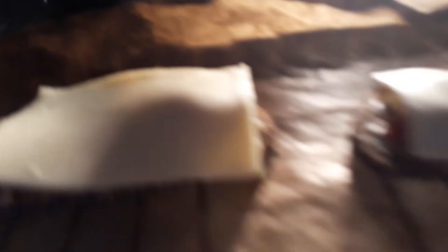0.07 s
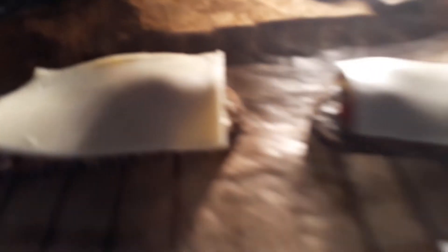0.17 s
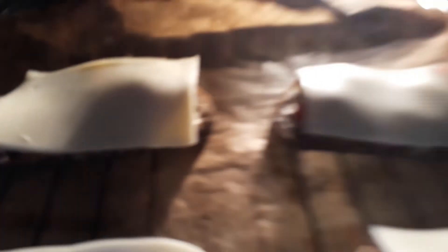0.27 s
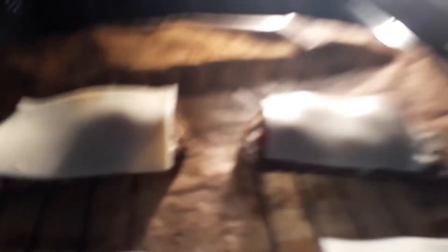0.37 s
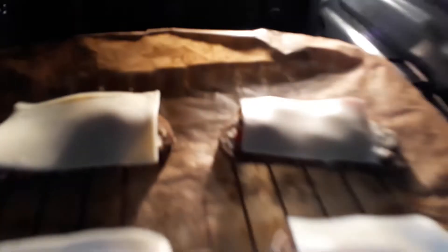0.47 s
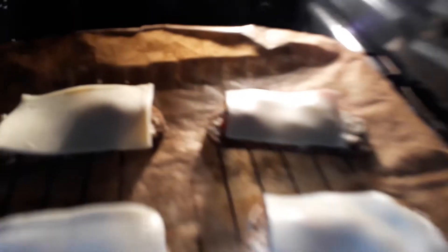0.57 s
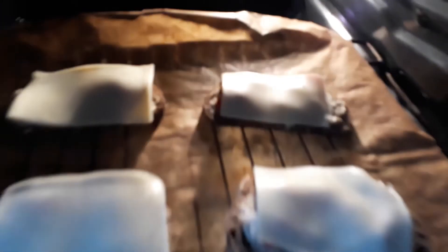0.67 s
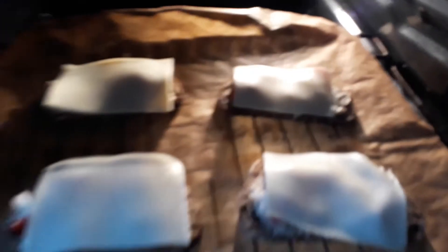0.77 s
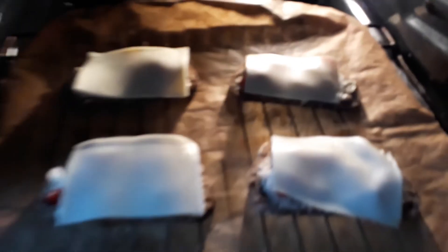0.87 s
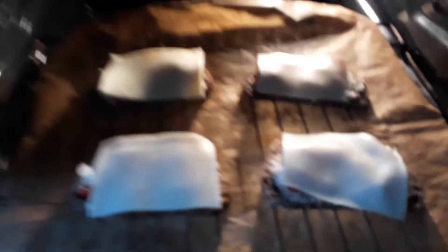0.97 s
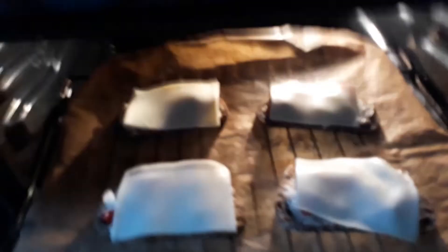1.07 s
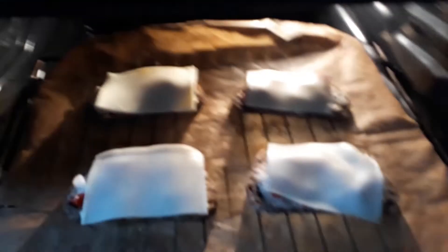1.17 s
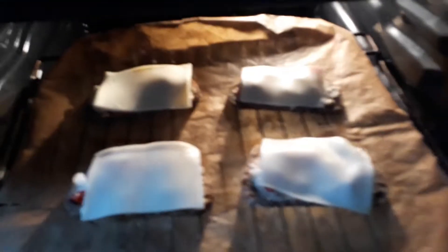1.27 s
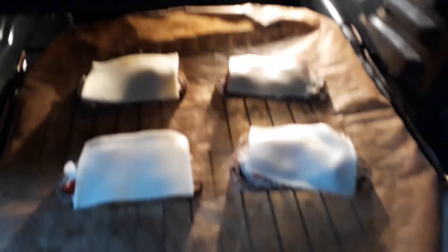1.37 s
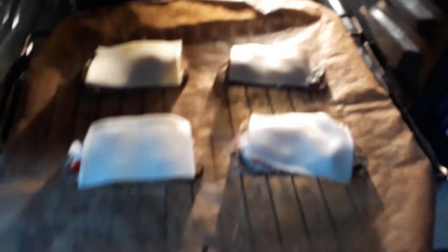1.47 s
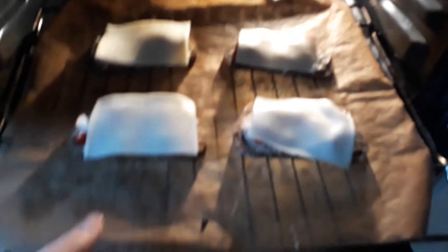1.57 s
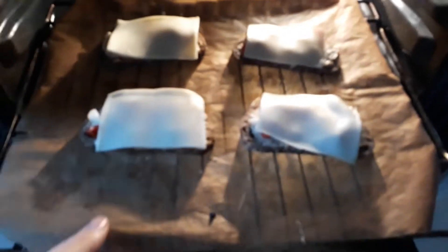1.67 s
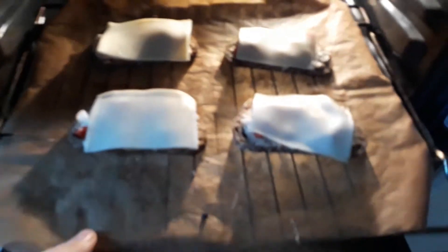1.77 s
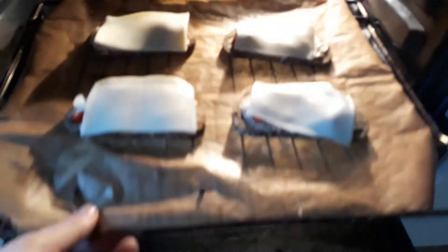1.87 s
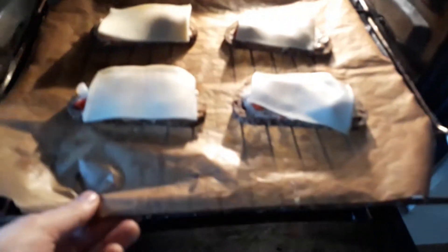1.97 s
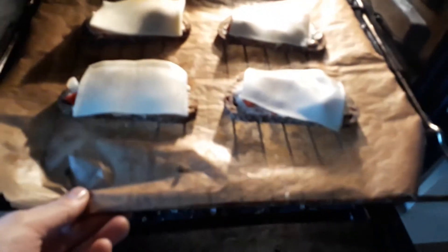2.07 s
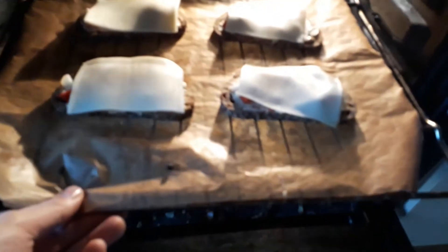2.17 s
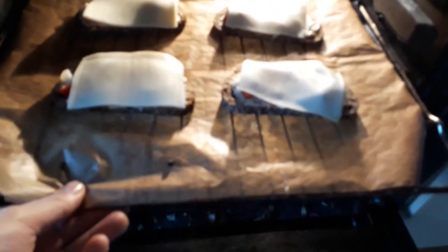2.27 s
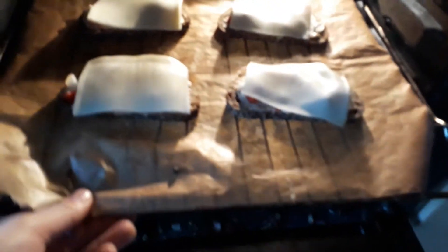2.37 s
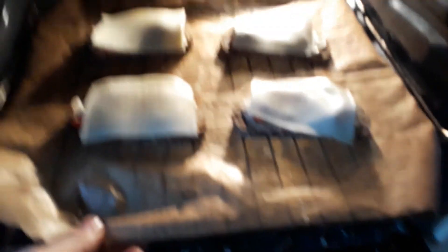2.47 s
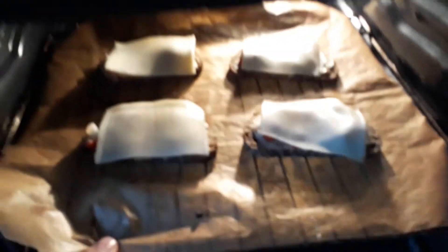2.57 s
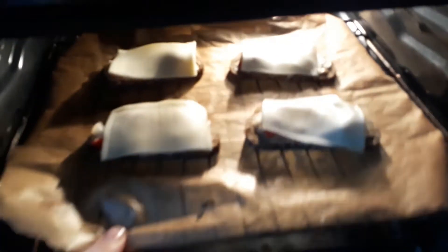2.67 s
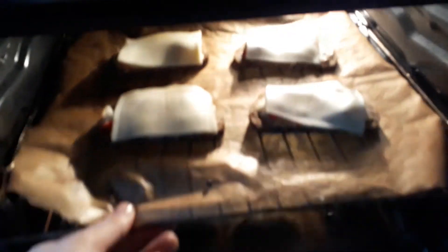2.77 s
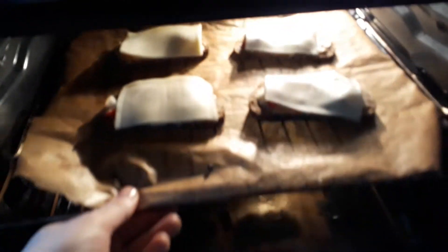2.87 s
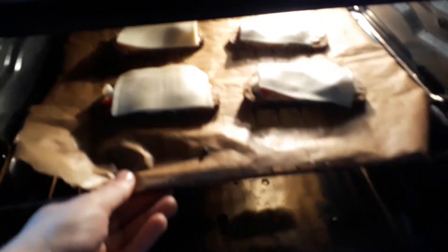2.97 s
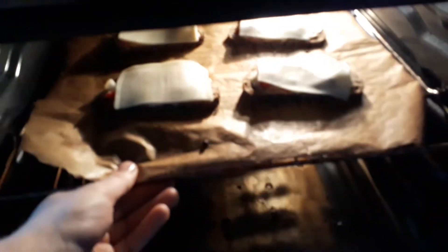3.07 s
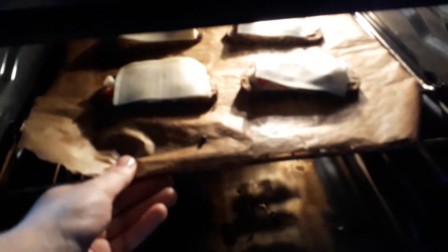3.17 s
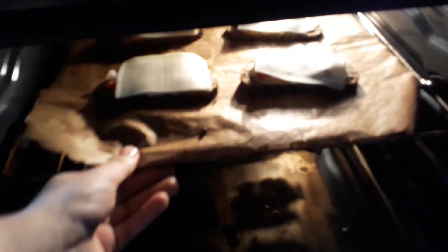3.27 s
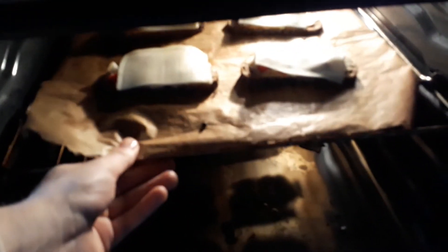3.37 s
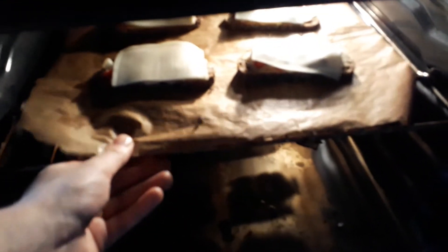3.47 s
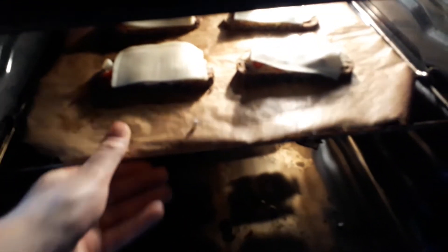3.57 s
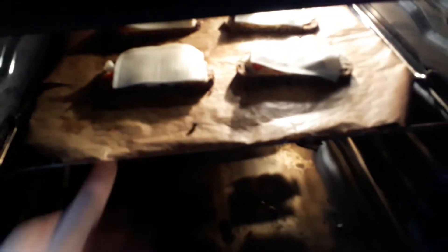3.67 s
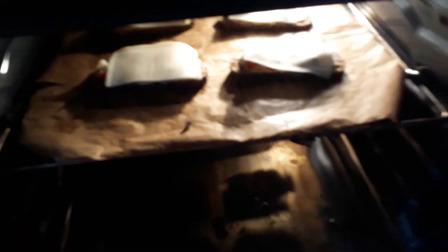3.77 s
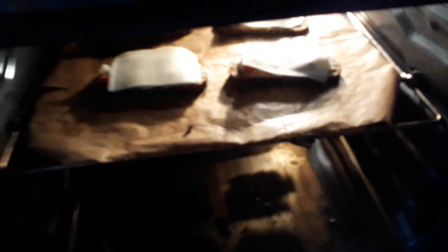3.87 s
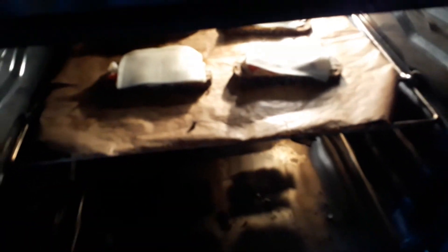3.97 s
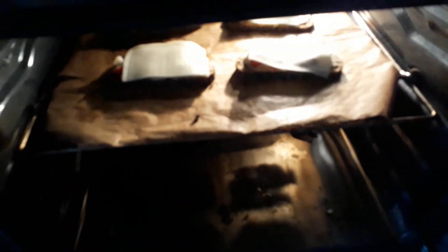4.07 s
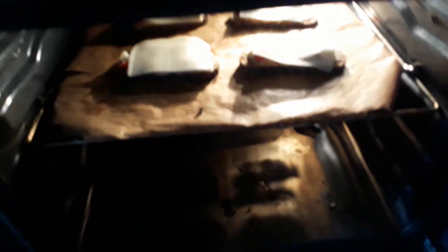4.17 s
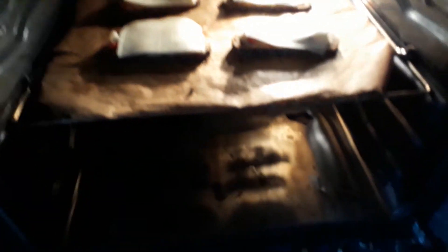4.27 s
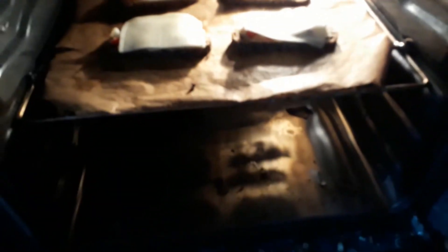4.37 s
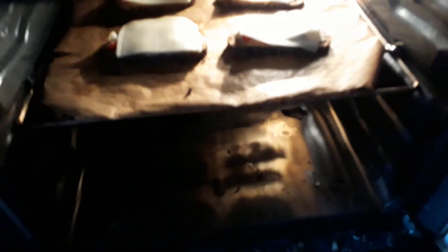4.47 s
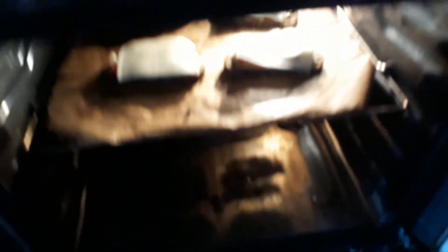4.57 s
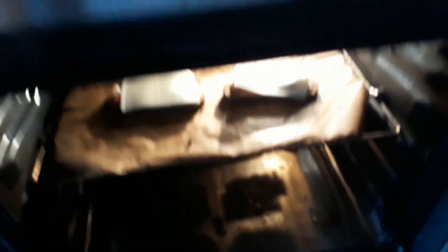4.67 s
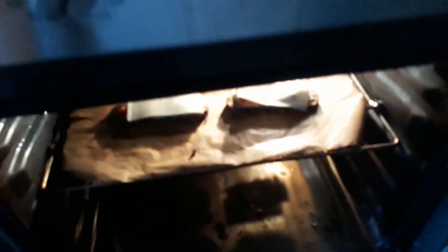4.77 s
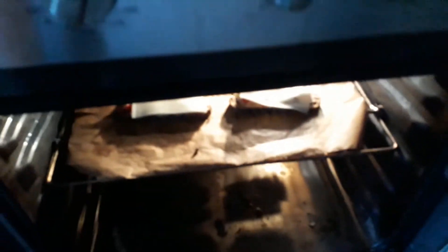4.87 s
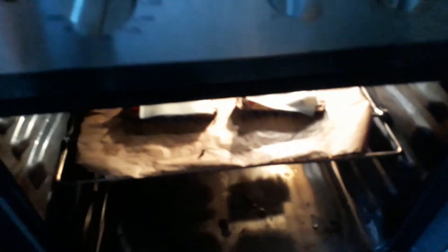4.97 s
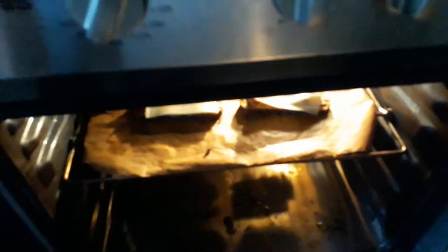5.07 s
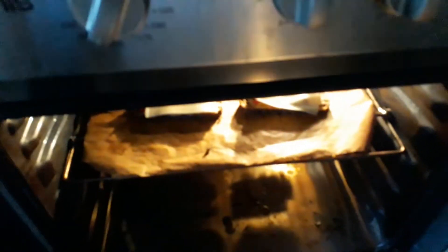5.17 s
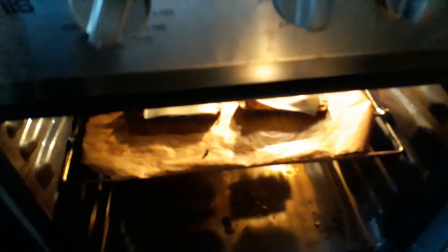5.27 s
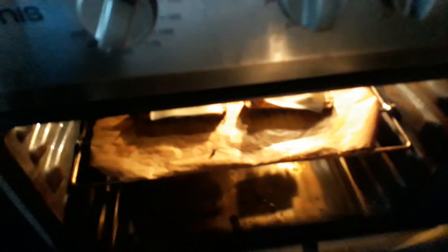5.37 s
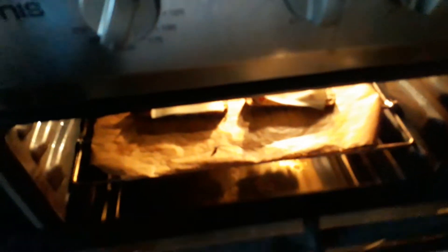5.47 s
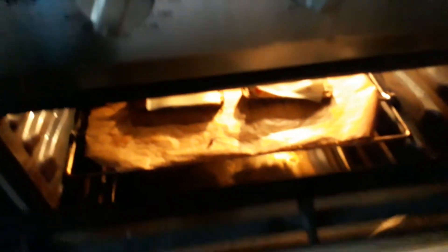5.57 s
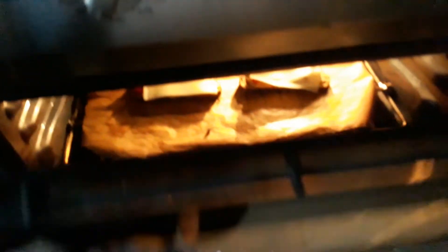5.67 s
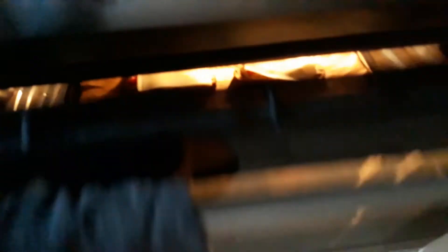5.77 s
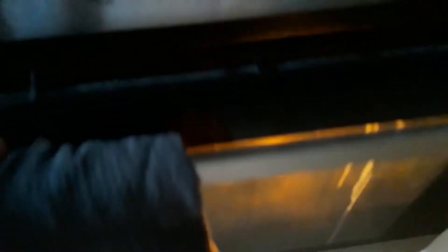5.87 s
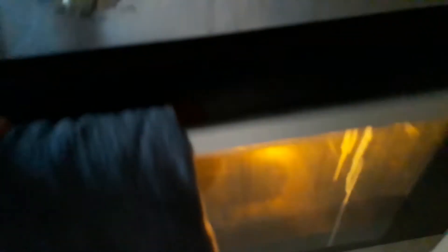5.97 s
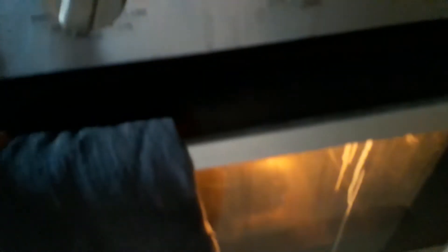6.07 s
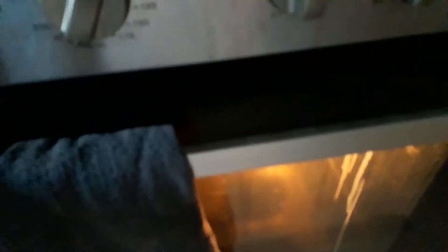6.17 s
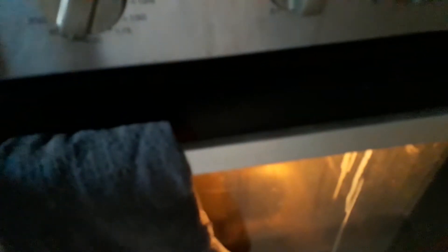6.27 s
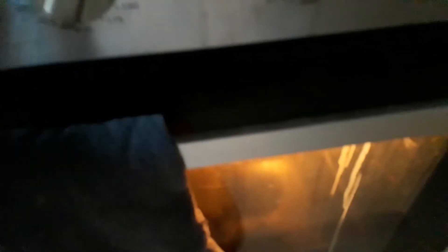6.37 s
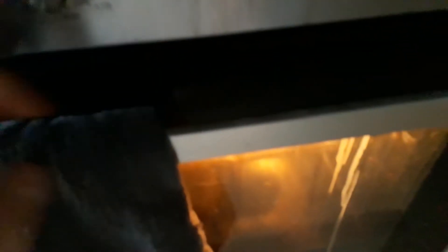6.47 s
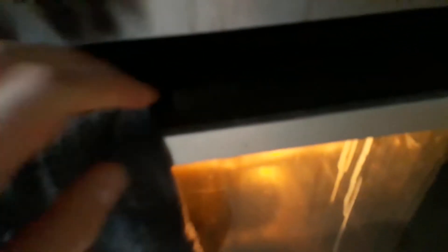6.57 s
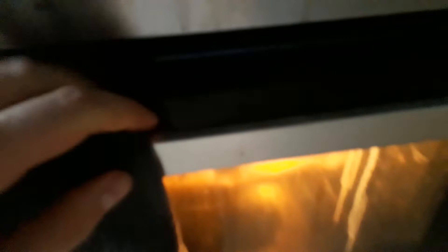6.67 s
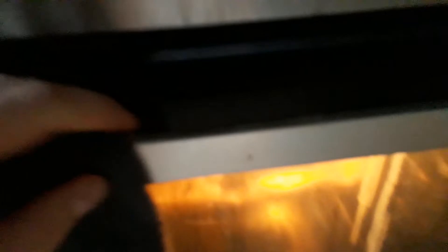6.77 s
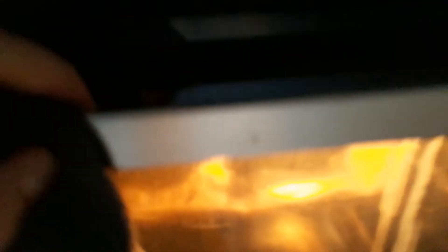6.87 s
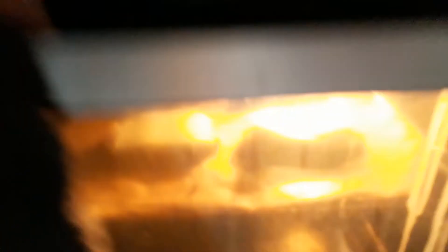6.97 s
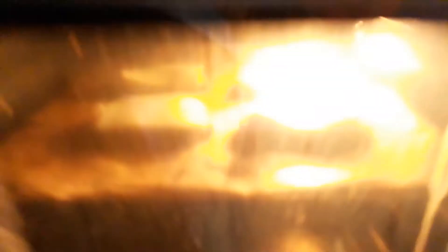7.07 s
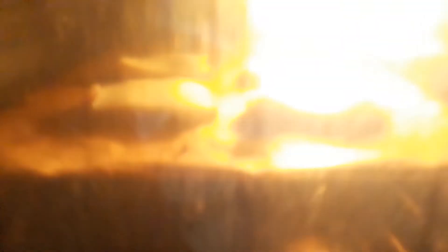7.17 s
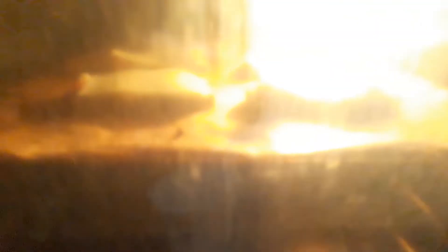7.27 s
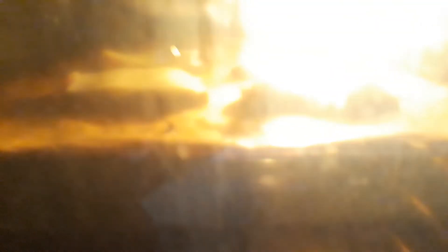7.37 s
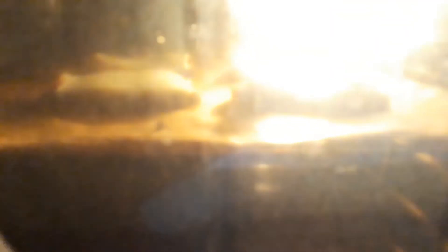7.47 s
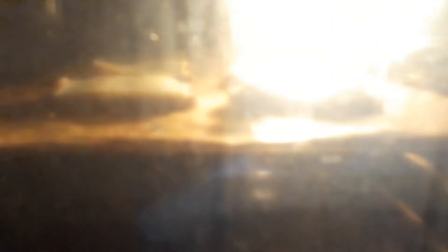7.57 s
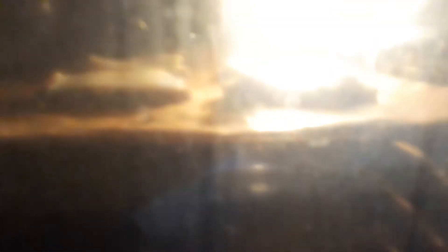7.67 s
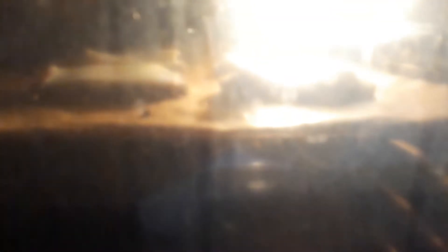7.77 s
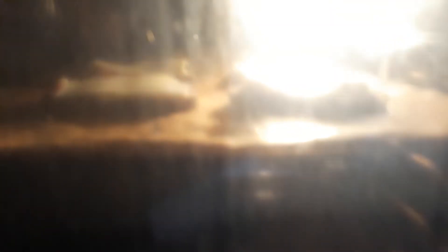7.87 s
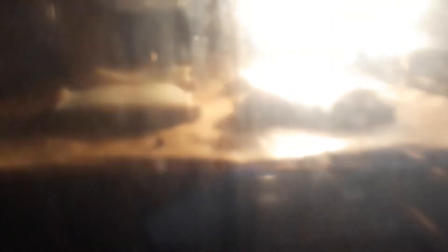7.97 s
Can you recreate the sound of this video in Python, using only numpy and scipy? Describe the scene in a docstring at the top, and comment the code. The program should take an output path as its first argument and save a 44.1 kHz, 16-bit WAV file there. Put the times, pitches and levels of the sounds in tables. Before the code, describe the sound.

A paper-lined tray scrapes and clanks into an oven in a quiet kitchen; after a pause the door slams, followed by soft cloth rubbing.

```python
"""Baking tray going into an oven

A tray lined with crackling paper grinds along a wire rack in a small kitchen and knocks home. The door is
lifted on clunking hinges and bangs shut; a towel slides off the handle; fingers brush the hand-held microphone.
Rubbing is filtered noise in strokes that swell, hold and die away. Impacts are a crack with a dying rattle,
and metal bodies ring at their own notes; the door's softest bumps are just a short hollow note."""
import sys
import numpy as np
from scipy import signal
from scipy.fft import rfft, irfft
from scipy.io import wavfile

SR = 44100
rng = np.random.default_rng(int(sys.argv[2]) if len(sys.argv) > 2 else 0)


def generate_wav(signal):
    """Clip the signal to [-1, 1] and save it as 16-bit WAV at the path in sys.argv[1]."""
    frames = np.transpose(np.atleast_2d(signal))
    scaled = np.clip(frames, -1, 1) * 32767
    pcm = np.round(scaled).astype(np.int16)
    wavfile.write(sys.argv[1], SR, pcm)


N = 353020
TIME = np.arange(N) / SR   # seconds


def from_db(db):
    """Turn decibels into a gain."""
    return 10 ** (np.asarray(db) / 20)


def at_hz(points, hz):
    """Read a table of (Hz, value) along a log-frequency axis."""
    table = np.array(points)
    return np.interp(np.log(hz + 1), np.log(table[:, 0]), table[:, 1])


def decay(t, t60):
    """Height of a dying vibration after t seconds; it falls 60 dB in t60 seconds."""
    return np.exp(-np.log(1000) * t / np.maximum(t60, 1e-3))


def convolve(x, response):
    """Filter a sound, keeping its length."""
    return signal.fftconvolve(x, np.atleast_2d(response), axes=1)[:, :x.shape[1]]


def tilt_at(hz, tilt_db, pivot_hz):
    """A slope in dB: flat well below the pivot, tilt_db per octave well above it."""
    return tilt_db * np.log2(1 + hz / pivot_hz)


def colour(x, spectrum, tilt_db=0, pivot_hz=200, size=4096):
    """Filter with this spectrum, scaled to unit power and then tilted; nothing sounds early."""
    hz = np.fft.rfftfreq(size, 1 / SR)
    gain = from_db(at_hz(spectrum, hz))
    gain = gain / np.sqrt(np.mean(gain ** 2))
    gain = gain * from_db(tilt_at(hz, tilt_db, pivot_hz))
    # fold the cepstrum to one side, which makes the filter minimum phase
    cepstrum = irfft(np.log(gain))[:size // 2]
    cepstrum[1:] *= 2
    return convolve(x, irfft(np.exp(rfft(cepstrum, size))))


def noise(size, grain_db=0, apart_hz=620):
    """Stereo noise made of grains of uneven size; long waves reach both microphones alike."""
    mid, side = rng.standard_normal((2, size))
    side = signal.sosfilt(signal.butter(2, apart_hz, "high", fs=SR, output="sos"), side)
    # each grain lasts 24 samples
    grain_sizes = np.minimum(rng.exponential(1, size // 24 + 1), 4.5)
    grains = np.repeat(from_db(grain_db * grain_sizes), 24)[:size]
    return np.array([mid + side, mid - side]) * grains / np.sqrt(np.mean(grains ** 2))


def ring(force, hz, t60):
    """A resonator: a unit click sets a dying sine of height 1 ringing."""
    r, w = decay(1 / SR, t60), 2 * np.pi * hz / SR
    return signal.lfilter([0, np.sin(w)], [1, -2 * r * np.cos(w), r * r], force + 1e-18)


def panned(x, pan_db):
    """Lean a sound to the left (right if negative) at constant power."""
    gains = from_db([[pan_db / 2], [-pan_db / 2]])
    return x * gains / np.sqrt(np.mean(gains ** 2))


def shaded(x, pan_db, bass_hz=600):
    """A source to one side: the bass bends round to both microphones, the treble does not."""
    bass = signal.lfilter(*signal.butter(1, bass_hz, fs=SR), x)
    return bass + panned(x - bass, pan_db)


def add(out, s, sound):
    """Mix a sound in at its time in seconds."""
    start = round(s * SR)
    out[:, start:start + sound.shape[1]] += sound[:, :N - start]


def strokes(rows, rise_s, fall_s):
    """Gain of rubbing: each stroke swells, holds from start to end and dies; rise and fall span 60 dB."""
    gain = 1e-8
    for start, end, db, *_ in rows:
        swell = decay(np.maximum(start - TIME, 0), rise_s)
        fade = decay(np.maximum(TIME - end, 0), fall_s)
        gain = np.maximum(gain, from_db(db) * swell * fade)
    return gain


def blow(spectrum, tilt_db, rattle_t60, crack_db, grain_db, pivot_hz,
         modes=(), chatter=.5, detune=0, size=28000):
    """A crack and a dying rattle of small contacts, which also set the body's modes ringing."""
    click = signal.unit_impulse(size)
    rattle = noise(size, grain_db) * decay(np.arange(size) / SR, rattle_t60)
    out = colour(rattle + from_db(crack_db) * click, spectrum, tilt_db, pivot_hz)
    force = click + chatter * rattle / np.sqrt(np.sum(rattle[0] ** 2))
    # detune shifts the modes a little with the point of support
    shifts = rng.uniform(-1.1, 1, len(modes))
    for k, ((hz, db, t60), shift) in enumerate(zip(modes, shifts)):
        height = (-1) ** k * from_db(db + tilt_at(hz, tilt_db, pivot_hz))
        out += height * ring(force, hz * (1 + detune * shift), t60)
    return out


# How long the kitchen echoes at each pitch. Each row: frequency in Hz, time to fall 60 dB in seconds.
KITCHEN_DECAY = [(60, 0.62), (300, 0.47), (700, 0.33), (4000, 0.37), (8000, 0.28), (16000, 0.19)]


def kitchen(x, wet_db, bass_hz=60, build_s=0.0023, size=36000):
    """Direct sound plus wall reflections that build up quickly and die soonest in the high treble."""
    t, hz = np.arange(size) / SR, np.fft.rfftfreq(size, 1 / SR)
    white, centres = rfft(noise(size)), [f for f, t60 in KITCHEN_DECAY]
    tail = 0
    for share, (f, t60) in zip(np.eye(len(centres)), KITCHEN_DECAY):
        band = irfft(white * at_hz(list(zip(centres, share)), hz), size)
        tail = tail + band * decay(t, t60)
    tail = tail * (1 - np.exp(-(t / build_s) ** 2))
    # a small source radiates little bass into the room
    tail = signal.lfilter(*signal.butter(1, bass_hz, "high", fs=SR), tail)
    return x + from_db(wet_db) * convolve(x, tail / np.sqrt(np.sum(tail ** 2) / 2))


# Spectrum of the kitchen's faint hiss. Each row: frequency in Hz, relative dB per Hz.
QUIET_SPECTRUM = [(25, -27.5), (64, -4.5), (220, -17), (700, -23), (3000, -24), (4000, -19), (6500, -24),
                  (8500, -31), (16000, -30)]


def quiet():
    """The faint steady hiss of the kitchen is filtered noise."""
    return from_db(-71) * shaded(colour(noise(N), QUIET_SPECTRUM), pan_db=-4.5)


# The palm shifts its grip. Each row: start in seconds, end in seconds, relative level in dB.
GRIP_STROKES = [(.25, 0.715, -68), (.425, 0.53, -46.5), (.52, 0.622, -48)]
# Fingers scuff the casing. Each row: start in seconds, end in seconds, relative level in dB.
SCUFF_STROKES = [(.257, .27, -52), (.354, .366, -46), (.39, .69, -61.5)]
# A finger wipes past the left microphone, swelling and then breaking off.
# Each row: start in seconds, end in seconds, relative level in dB.
WIPE_STROKES = [(.947, .959, -40.5), (.98, .992, -58.5)]
# Fingers tap beside the microphones. Each row: time in seconds, relative level in dB,
# tilt in dB per octave, time for the rattle to fall 60 dB in seconds, lean to the left in dB.
FINGER_TAPS = [(.957, -36, -21, .14, 19), (6.892, -41.5, -6.5, 0.061, 2), (6.903, -43, -2.5, 0.28, -2.5),
               (7.943, -43, 0, 0.18, 33), (7.986, -49.5, 2, 0.63, 29)]
# Spectrum of the rubbing palm. Each row: frequency in Hz, relative dB per Hz.
SKIN_SPECTRUM = [(50, -19), (110, 1.5), (220, 0.5), (420, -1.5), (1600, -5), (2700, -14), (6500, -10),
                 (9200, -16.5), (14000, -8.5), (16000, -11)]
# Spectrum of a wiping or tapping finger, before any tilt. Each row: frequency in Hz, relative dB per Hz.
FINGER_SPECTRUM = [(60, -14), (130, 1.5), (260, -14.5), (450, -1), (900, -0.5), (1600, 0), (5000, 0.5),
                   (7000, -0.5), (9000, -6.5), (11000, -4.5), (16000, -20)]


def fingers():
    """Skin rubs and taps right at the microphones, too close for the room to matter."""
    palm_rub = noise(N, grain_db=2.0) * strokes(GRIP_STROKES, rise_s=0.27, fall_s=0.11)
    palm = colour(palm_rub, SKIN_SPECTRUM)
    scuff_rub = noise(N, grain_db=2) * strokes(SCUFF_STROKES, rise_s=0.054, fall_s=0.21)
    scuff = colour(scuff_rub, [(200, -31), (900, -6.5), (2300, 1.5), (3500, -6.0),
                               (6000, -7.0), (9000, -21.0), (16000, -6)])   # Hz, relative dB per Hz
    out = shaded(palm + scuff, pan_db=-15, bass_hz=1510)
    wipe_rub = noise(N, grain_db=2.5) * strokes(WIPE_STROKES, rise_s=0.2, fall_s=0.02)
    out += from_db(-2.5) * panned(colour(wipe_rub, FINGER_SPECTRUM), pan_db=30)
    for s, db, tilt, rattle, pan in FINGER_TAPS:
        tap = blow(FINGER_SPECTRUM, tilt, rattle, crack_db=11.0, grain_db=0.0, pivot_hz=2016)
        add(out, s, from_db(db + 4.0) * panned(tap, pan))
    return out


# Light clicks of the oven's fittings. Each row: time in seconds, relative level in dB,
# time for the rattle to fall 60 dB in seconds, lean to the left in dB.
FITTING_CLICKS = [(.727, -43.5, 0.33, -0.5), (5.543, -42.5, 0.34, -4), (6.339, -57, 0.12, -2.5)]
# Spectrum of a click. Each row: frequency in Hz, relative dB per Hz.
CLICK_SPECTRUM = [(100, -11.5), (300, -16.5), (1000, -14.5), (2000, -4), (3500, 0), (6500, -4.5),
                  (8500, -13), (16000, -12)]


def clicks():
    """Small metal parts tick and rattle."""
    out = np.zeros((2, N))
    for s, db, rattle, pan in FITTING_CLICKS:
        click = blow(CLICK_SPECTRUM, 0, rattle, crack_db=3, grain_db=1.5, pivot_hz=1500)
        add(out, s, from_db(db - 3) * panned(click, pan))
    return kitchen(out, wet_db=-5.5)


# The tray slides in shoves. Each row: start in seconds, end in seconds, relative grinding level in dB.
TRAY_SHOVES = [(1.52, 1.58, -60.5), (1.69, 2.52, -50), (2.56, 2.563, -42.5), (2.6, 2.793, -42.5),
               (2.84, 2.88, -42), (2.9, 3.24, -45), (3.47, 3.54, -51.5)]


def shoving():
    """Effort of the shoves, which drives both the grinding tray and the rustling paper."""
    return strokes(TRAY_SHOVES, rise_s=0.22, fall_s=0.61)


# The paper crumples in runs of snaps. Each row: start in seconds, end in seconds,
# relative snap level in dB, tilt in dB per octave.
PAPER_CRUMPLES = [(1.654, 1.697, -13, -7), (1.715, 1.77, -10.5, -0.5), (3.454, 3.5, -15, -7.5)]
SNAP_GAP_S, SNAP_SPREAD_DB = .014, 0.5   # average gap and largest change of level within a run


def crumple_snaps():
    """Each crumple is a run of unevenly spaced snaps of uneven size, in the columns of the loud snaps."""
    snaps = []
    for start, end, db, tilt in PAPER_CRUMPLES:
        for k, (shift, size) in enumerate(rng.uniform(-1, 1, (10, 2))):
            if k * SNAP_GAP_S < end - start:
                snaps.append((start + SNAP_GAP_S * (k + .3 * shift), db + SNAP_SPREAD_DB * size, tilt))
    return snaps


# Single loud paper snaps. Each row: time in seconds, relative level in dB, tilt in dB per octave.
PAPER_SNAPS = [(1.497, -31.5, 0.5), (1.549, -38.5, 3.5), (1.603, -37, 1), (1.632, -24, 0),
               (1.702, -13, 5.5), (1.761, -12.5, 2.5), (1.867, -6.5, -2), (1.917, -35, 3),
               (2.038, -25.5, -2), (2.099, -17, -0.5), (2.213, -13.5, 1), (2.249, -14, -3), (2.276, -15, 1),
               (2.333, -11, -15), (3.088, -18.5, 3), (3.397, -23, 1.5), (3.405, -12, 0),
               (3.44, -13.5, -1.5)]
# Spectrum of the paper, before any tilt. Each row: frequency in Hz, relative dB per Hz.
PAPER_SPECTRUM = [(100, -19.5), (500, 0), (1000, -7.5), (1500, -1), (4500, -2), (6500, -3.5), (8500, -9),
                  (10500, -5), (16000, -11.5)]


def paper():
    """Baking paper buckles in snaps over a bed of fine crackle, and rustles as the tray slides."""
    rustle = from_db(-17) * shoving()   # relative to the grinding
    crackle = from_db(-32) * strokes(PAPER_CRUMPLES, rise_s=0.14, fall_s=.15)   # relative to the snaps
    out = colour(noise(N, grain_db=1.5) * np.hypot(rustle, crackle), PAPER_SPECTRUM)
    for s, db, tilt in PAPER_SNAPS + crumple_snaps():
        snap = blow(PAPER_SPECTRUM, tilt, rattle_t60=0.036, crack_db=4.0, grain_db=1.5,
                    pivot_hz=3000, size=9000)
        add(out, s, from_db(db - 14.5) * snap)
    return kitchen(out, wet_db=-1.5)


# Notes of the free tray, before each contact shifts them.
# Each row: frequency in Hz, relative level in dB, time to fall 60 dB in seconds.
TRAY_NOTES = [(114, -11.5, 0.15), (135, -0.5, 0.19), (163.4, 1, 0.18), (209, -16, 0.41), (326, -12, 0.14),
              (383, -10.5, 0.13), (451, -11, 0.27), (552, -14, .22), (613, -12.5, 0.3), (735, -7.5, 0.26),
              (850, -16.5, 0.35), (1245, -16.5, 0.22), (1405, -17.5, 0.3), (2040, -17.5, 0.3),
              (2890, -25, .25), (3470, -22.5, .22)]
SLIP_DB, SLIP_SPREAD_DB = -7.5, 3   # slip level relative to the effort; scale of the spread among partials
# the point of contact shifts the tray's notes by up to this share, and scales their ring
SLIP_DETUNE, SLIP_DAMPING = 0.038, .55
# pings of the rack wires: lowest and highest pitch, level, slope in dB per octave, time to fall 60 dB
WIRE_LOW_HZ, WIRE_HIGH_HZ, WIRE_DB, WIRE_TILT_DB, WIRE_RING_S = 693, 4820, 5, -3, 0.025


def slips(effort, count=220, size=4400, order=7):
    """The rim catches and slips unevenly; each slip rings the tray anew and pings some rack partials."""
    out, t = np.zeros((2, N)), np.arange(size) / SR
    mode_hz, mode_db, mode_t60 = np.transpose(TRAY_NOTES)
    for s in rng.uniform(TRAY_SHOVES[0][0], TRAY_SHOVES[-1][1], count):
        octaves = rng.random(order) * np.log2(WIRE_HIGH_HZ / WIRE_LOW_HZ)
        tray_hz = mode_hz * (1 + SLIP_DETUNE * rng.uniform(-1, 1, len(mode_hz)))
        hz = np.r_[tray_hz, WIRE_LOW_HZ * 2 ** octaves]
        db = np.r_[mode_db, WIRE_DB + WIRE_TILT_DB * octaves]
        db = db + SLIP_SPREAD_DB * rng.uniform(-1.8, 2.6, len(hz))
        t60 = np.r_[mode_t60 * SLIP_DAMPING, np.full(order, WIRE_RING_S)]
        partials = np.sin(2 * np.pi * hz[:, None] * t) * decay(t, t60[:, None])
        # high partials reach the two microphones with unequal strength
        lean = rng.uniform(-1, 1, len(hz)) * np.minimum(hz / 1000, 1)
        signs = rng.choice([-1, 1], len(hz))
        gains = from_db(db + SLIP_DB) * signs * np.array([1 + lean, 1 - lean])
        add(out, s, effort[round(s * SR)] * gains @ partials)
    return out


# The tray knocks on the rack. Each row: time in seconds, relative level in dB, hardness in dB per octave.
TRAY_KNOCKS = [(1.511, -55, 3), (1.814, -23, -2), (1.979, -33, 2.5), (2.18, -25, -6), (2.387, -30, -7.5),
               (2.591, -26.5, 1), (2.612, -27.5, -4.5), (2.638, -19.5, -0.5), (2.811, -28.5, -5.5),
               (2.986, -20, -4.5), (3.094, -21, -6), (3.212, -32, -0.5), (3.224, -22.5, 0)]
# Spectrum of a knock, before its hardness tilts it. Each row: frequency in Hz, relative dB per Hz.
KNOCK_SPECTRUM = [(40, -27.5), (100, -3), (160, 15), (270, 3), (450, 4), (1000, 0), (1400, -3),
                  (3800, -4.5), (5500, -11.5), (8500, -24), (11000, -26), (16000, -30.5)]
# Spectrum of the steady grinding. Each row: frequency in Hz, relative dB per Hz.
GRIND_SPECTRUM = [(50, -30.5), (145, 0), (250, -3.5), (500, -11.5), (730, -8), (900, -15.5), (1900, -15),
                  (3000, -25), (3800, -20), (8700, -36), (16000, -35.5)]
# Spectrum of the tray's crash against the back wall. Each row: frequency in Hz, relative dB per Hz.
CRASH_SPECTRUM = [(170, 0), (300, -3.5), (450, 1), (950, -6), (1300, 0), (2000, -9), (3600, -6.5),
                  (4600, -13.5), (9000, -28.5)]
# Notes of the oven's back wall, which clanks when the tray reaches it.
# Each row: frequency in Hz, relative level in dB, time to fall 60 dB in seconds.
BACK_WALL_NOTES = [(373, -0.5, 0.15), (459, 4, .2), (860, -11, .26), (1206, 0.5, .17), (1445, -14, 0.3),
                   (1900, -13, 0.17), (2418, -9.5, 0.22), (2520, -7.5, .17), (3350, -8.5, .2),
                   (3570, -8, .16), (4130, -6.5, 0.092), (4533, -9.5, .2)]
HOME_S, HOME_DB, HOME_RING_S = 3.224, -22.5, 0.17   # the crash: when, how loud, 60 dB fall of its rattle


def tray():
    """Sheet metal bumps over the rack wires, grinds and rattles between bumps, and strikes the back wall."""
    out = np.zeros((2, N))
    for s, db, hardness in TRAY_KNOCKS:
        knock = blow(KNOCK_SPECTRUM, hardness, rattle_t60=0.18, crack_db=8.0, grain_db=1.0,
                     pivot_hz=260, modes=TRAY_NOTES, chatter=0.78, detune=0.031)
        add(out, s, from_db(db - 0.5) * knock)
    crash = blow(CRASH_SPECTRUM, 0, HOME_RING_S, crack_db=4, grain_db=2.5,
                 pivot_hz=260, modes=BACK_WALL_NOTES, chatter=.25)
    add(out, HOME_S, from_db(HOME_DB) * crash)
    effort = shoving()
    grinding = colour(noise(N, grain_db=1.5) * effort, GRIND_SPECTRUM)
    out += slips(effort) + from_db(-0.43) * grinding
    # a thin sheet radiates no deep bass
    radiated = signal.sosfilt(signal.butter(2, 62, "high", fs=SR, output="sos"), out)
    return shaded(kitchen(radiated, wet_db=-5.5, bass_hz=324), pan_db=-1.5)


# The door is swung. Each row: start in seconds, end in seconds, relative rumble level in dB.
DOOR_SWINGS = [(4.09, 4.11, -68.5), (4.33, 4.39, -64), (5.74, 5.79, -63), (5.89, 5.92, -51)]
# Hinge clunks as the door is lifted. Each row: time in seconds, relative level in dB,
# hardness in dB per octave, time for the rattle to fall 60 dB in seconds.
HINGE_CLUNKS = [(4.221, -63, 2.5, 0.13), (5.112, -57.5, 3.5, 0.1), (5.128, -60, 4, 0.11),
                (5.214, -39.5, 1.82, 0.16), (5.229, -27.5, -0.8, 0.15), (5.802, -32.5, -7.5, 0.22)]
# Spectrum of a clunk, before its hardness tilts it. Each row: frequency in Hz, relative dB per Hz.
HINGE_SPECTRUM = [(40, -5.5), (100, 1.5), (200, 4), (600, -1), (900, -4), (4500, -9), (6000, -18),
                  (16000, -34.5)]
# Notes of the hinges. Each row: frequency in Hz, relative level in dB, time to fall 60 dB in seconds.
HINGE_NOTES = [(106.5, -9, .12), (380.4, -13.5, 0.27), (584, -14.5, .3), (739, -13, .25), (874, -12, .23),
               (1345, -15.5, 0.19), (1610, -17, .19)]


def hinges():
    """The sprung hinges rumble and clunk as the door swings up."""
    rumble = colour(noise(N), [(30, -22.5), (60, 3.0), (120, -3.0), (400, -16.5),
                               (1500, -34), (6000, -60.5)])   # Hz, relative dB per Hz
    out = from_db(-3.0) * strokes(DOOR_SWINGS, rise_s=0.7, fall_s=0.6) * rumble
    for s, db, hardness, rattle in HINGE_CLUNKS:
        clunk = blow(HINGE_SPECTRUM, hardness, rattle, crack_db=-1.0, grain_db=1,
                     pivot_hz=250, modes=HINGE_NOTES, chatter=.4)
        add(out, s, from_db(db - 2.0) * clunk)
    return kitchen(out, wet_db=-1.0)


# Sleeve and towel strokes. Each row: start in seconds, end in seconds, relative level in dB.
CLOTH_STROKES = [(4.6, 4.82, -65), (6.63, 7.02, -53.5), (7.1, 7.32, -52), (7.35, 7.46, -58.5)]
# The hand drags along the door handle. Each row: start in seconds, end in seconds, relative level in dB.
HANDLE_STROKES = [(6.61, 6.63, -55)]
# Spectrum of brisk cloth. Each row: frequency in Hz, relative dB per Hz.
FABRIC_SPECTRUM = [(100, -9), (900, -12), (2200, -0.5), (4300, 3.5), (6800, 1.5), (8600, -7), (11000, -2),
                   (16000, -7.5)]
# Spectrum of the door, for the handle here and, tilted, for the bang. Each row: frequency in Hz,
# relative dB per Hz.
DOOR_SPECTRUM = [(38, -14.5), (54, 3.5), (100, 1.5), (160, -0.5), (330, 4.5), (600, -6), (900, -3.5),
                 (1500, -6), (2500, -2), (3900, 0), (5000, -6), (6700, -12), (8800, -24), (11000, -23.5),
                 (16000, -36.5)]


def cloth():
    """Sleeve and towel slide with a fine hiss, brighter the faster they move; the handle hums under the hand."""
    speed = strokes(CLOTH_STROKES, rise_s=0.59, fall_s=0.66)
    briskness = speed / speed.max()
    soft = colour(noise(N, grain_db=1.5), FABRIC_SPECTRUM, tilt_db=-6.5, pivot_hz=5970)
    brisk = colour(noise(N, grain_db=1), FABRIC_SPECTRUM)
    # crossfade from the dull hiss to the bright one
    hiss = speed * (from_db(10.0) * np.sqrt(1 - briskness) * soft + np.sqrt(briskness) * brisk)
    drag = noise(N) * strokes(HANDLE_STROKES, rise_s=0.27, fall_s=2.25)
    hum = colour(drag, DOOR_SPECTRUM) + from_db(-34.5) * ring(drag, hz=172.4, t60=0.15)
    return shaded(hiss + hum, pan_db=-5.0)


# The door meets seal and frame. Each row: time in seconds, relative level in dB,
# hardness in dB per octave, time for the rattle to fall 60 dB in seconds.
DOOR_SLAM = [(5.931, -20.5, -3.5, 0.11), (5.936, -16, 0.5, 0.29), (5.962, -19, -1, 0.31),
             (5.982, -24.5, -1, .15)]
# The door bumps softly as it settles on its seal. Each row: time in seconds, relative level in dB.
DOOR_SETTLING = [(6.35, -43.5), (6.378, -41.5), (6.406, -45.5), (7.444, -57.5), (7.476, -57)]
# Notes of the door. Each row: frequency in Hz, relative level in dB, time to fall 60 dB in seconds.
DOOR_NOTES = [(54.1, -19, 0.46), (85.7, -15.5, 0.55), (164.7, -19, 0.68), (209, -22.5, 0.61),
              (322, -12, 0.28), (367, -18.5, 0.62), (768, -17, 0.24), (1204, -16.5, 0.26), (1997, -16, .27),
              (2590, -18, .27), (3122, -25.5, .27), (3408, -18.5, .32), (3780, -14.5, 0.28),
              (4700, -15, 0.26)]


def door():
    """Glass and frame bang against the oven, then settle on the seal in a few soft bumps."""
    out, bumps = np.zeros((2, 2, N))
    for s, db, hardness, rattle in DOOR_SLAM:
        bang = blow(DOOR_SPECTRUM, hardness, rattle, crack_db=6, grain_db=0.85,
                    pivot_hz=246, modes=DOOR_NOTES, chatter=0.57)
        add(out, s, from_db(db - 1.0) * bang)
    for s, db in DOOR_SETTLING:
        add(bumps, s, from_db(db) * np.ones((2, 1)))
    hollow_note = ring(bumps, hz=363.2, t60=0.063)
    out += signal.lfilter(*signal.butter(2, [240, 520], "band", fs=SR), hollow_note)
    return shaded(kitchen(out, wet_db=-4.5, bass_hz=40), pan_db=-2.5)


def scene():
    """All sources over the faint steady hiss of the kitchen."""
    return quiet() + fingers() + clicks() + paper() + tray() + hinges() + cloth() + door()


def record(dry):
    """The deepest bass is cut, the highest peaks are rounded, the top is cut."""
    thin = signal.sosfilt(signal.butter(2, 32, "high", fs=SR, output="sos"), dry)
    rounded = thin / (1 + (thin / .9) ** 4) ** .25
    return signal.sosfilt(signal.ellip(10, .2, 70, 16100, fs=SR, output="sos"), rounded)


dry = scene()
out = record(dry)
generate_wav(out)
```